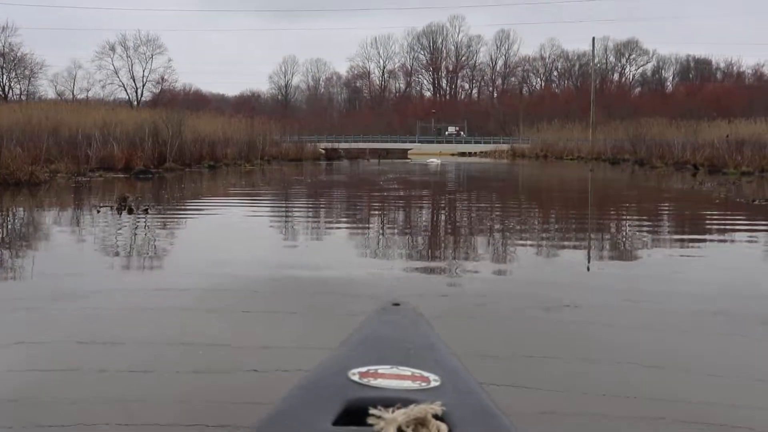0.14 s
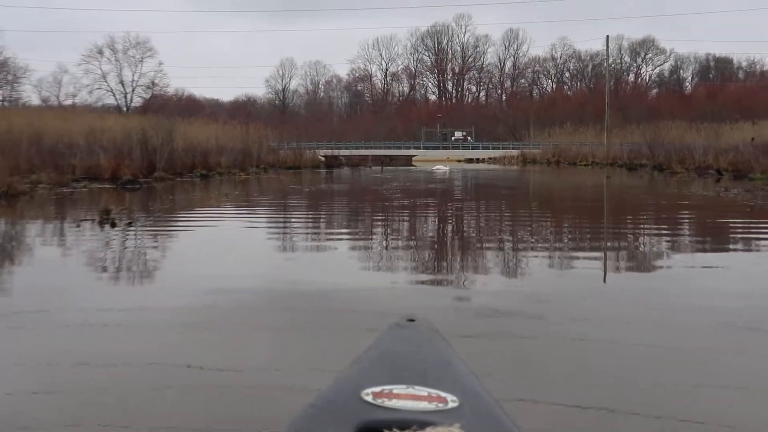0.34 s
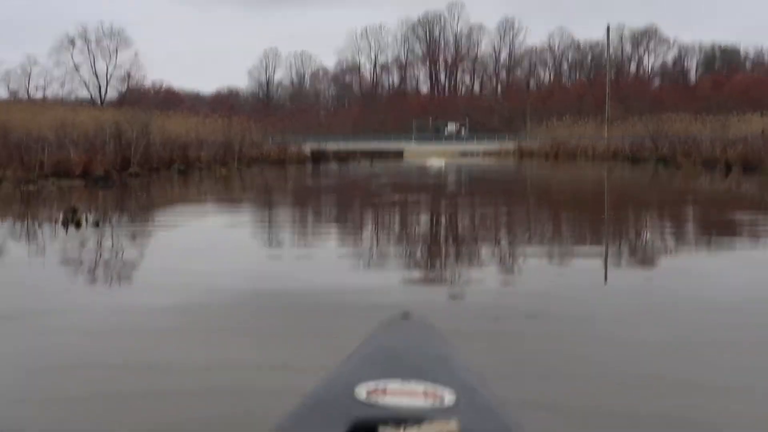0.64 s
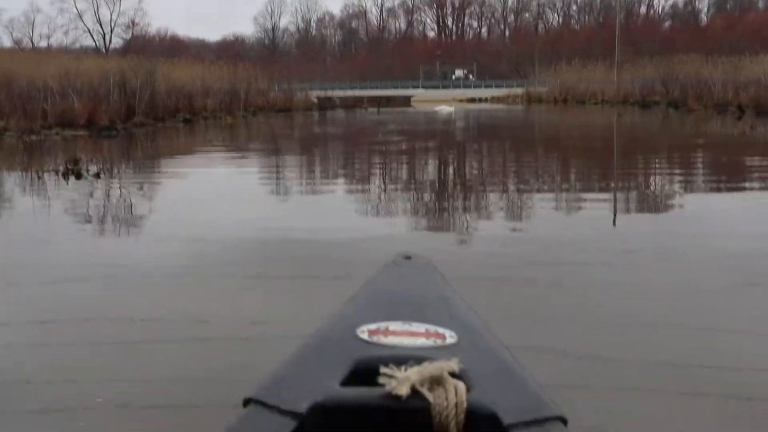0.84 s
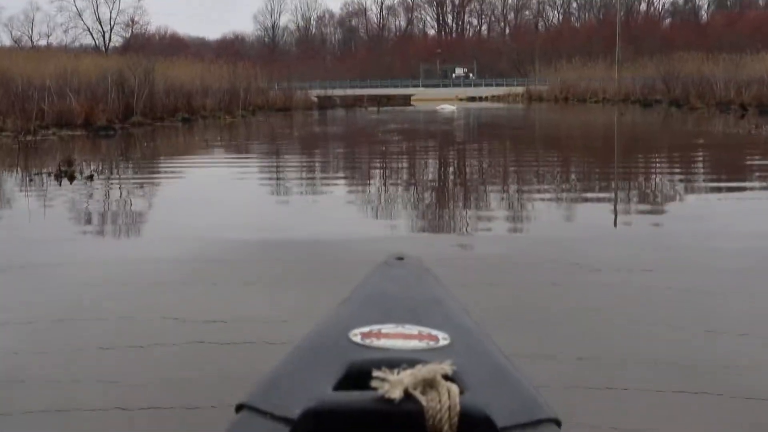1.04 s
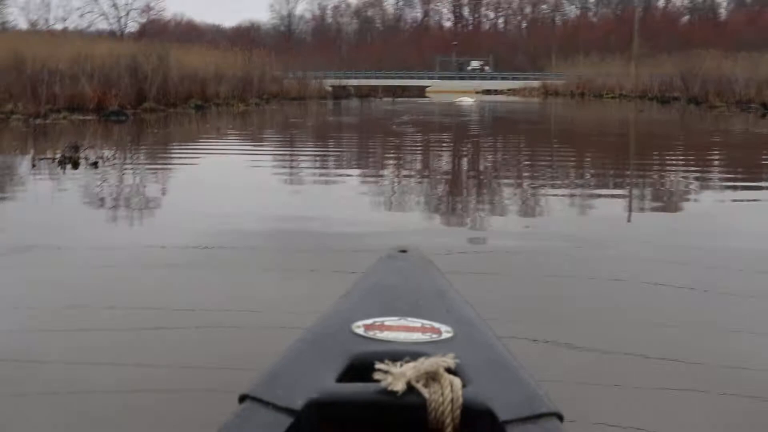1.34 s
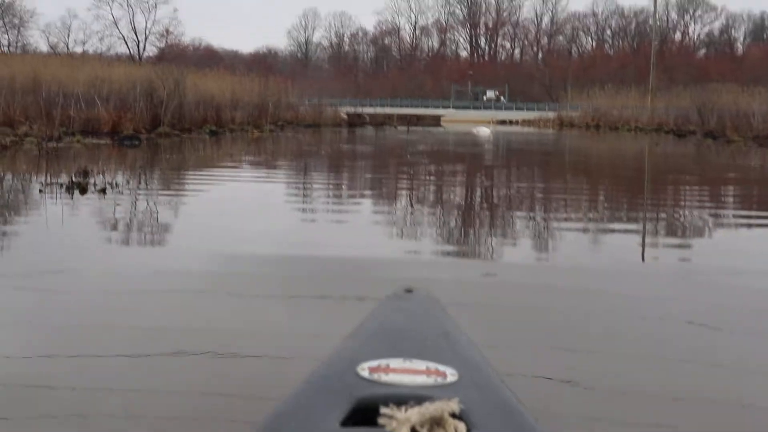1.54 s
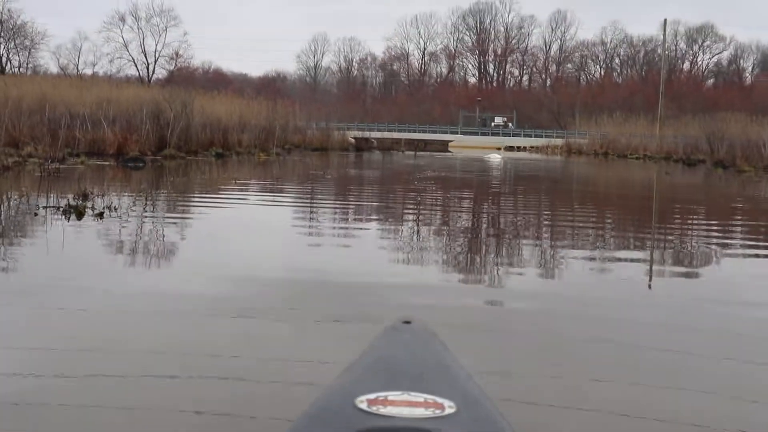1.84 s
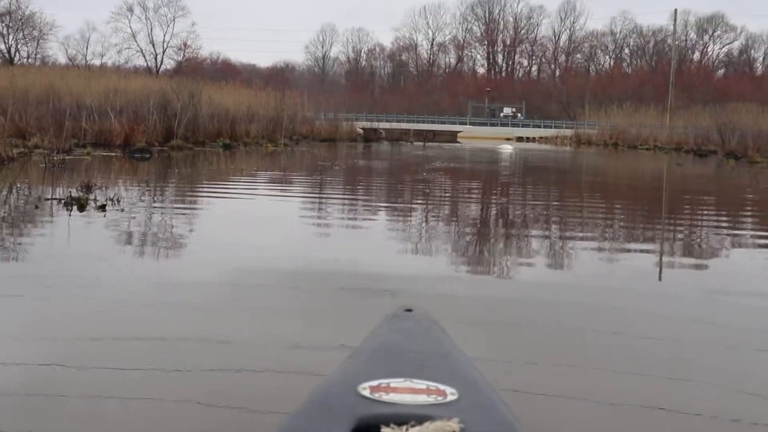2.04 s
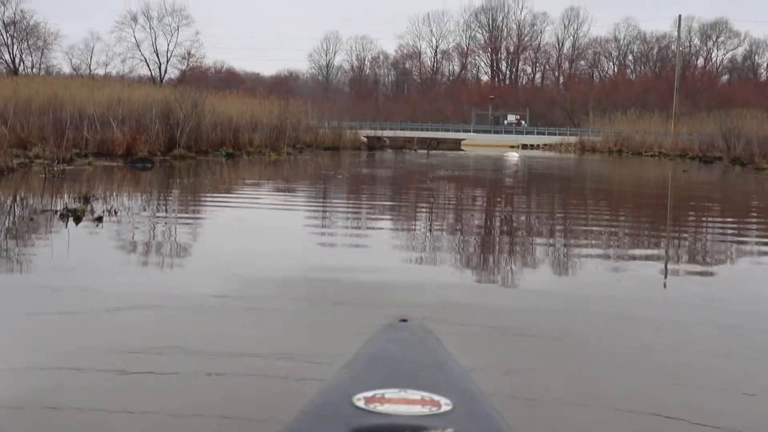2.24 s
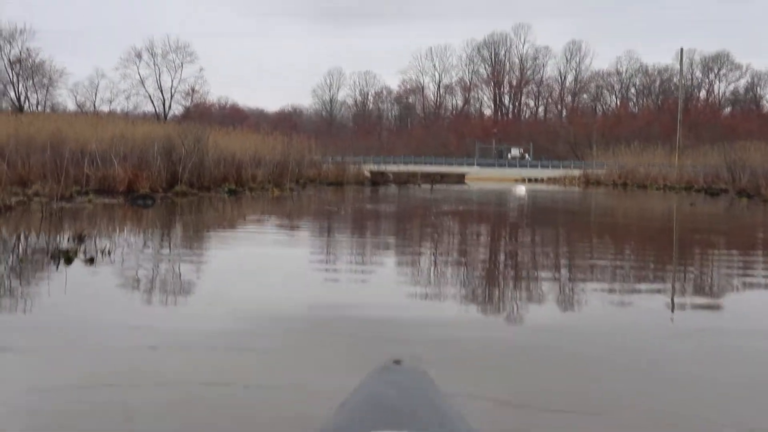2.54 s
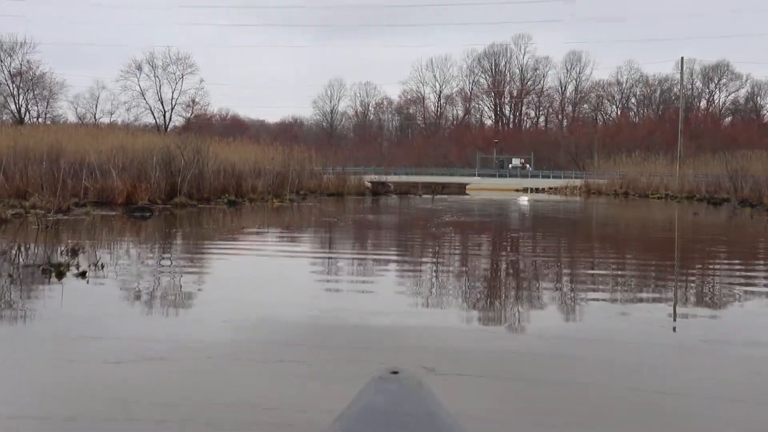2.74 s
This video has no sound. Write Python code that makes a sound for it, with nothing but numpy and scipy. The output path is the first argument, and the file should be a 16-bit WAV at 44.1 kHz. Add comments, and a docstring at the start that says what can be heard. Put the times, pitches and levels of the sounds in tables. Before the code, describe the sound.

A canoe knocks hollowly on quiet water, with a paddle scrape, small plops and faint whining.

```python
"""A hollow knock rings a canoe's hull over the distant rumble and airy hiss of a quiet marsh, while a
tiny motor whines thinly throughout. A paddle scrapes the hull in three quick strokes and sets it booming.
Water ticks and laps at the bow, droplets spit, trapped bubbles plop, and a low surge passes underneath.
Small birds chip and buzz far off, echoed by the reeds."""
import sys
import numpy as np
from scipy import signal
from scipy.fft import rfft, irfft
from scipy.io import wavfile
from scipy.ndimage import uniform_filter1d

SR = 44100
rng = np.random.default_rng(int(sys.argv[2]) if len(sys.argv) > 2 else 0)


def waveform_to_disk(signal):
    """Save audio, clipped to [-1, 1], as 16-bit WAV at the path in sys.argv[1]."""
    frames = np.transpose(np.atleast_2d(signal))
    scaled = np.clip(frames, -1, 1) * 32767
    samples = np.round(scaled).astype(np.int16)
    wavfile.write(sys.argv[1], SR, samples)


N = 127008
TOP_HZ = 15800


def undb(db):
    """Decibels to gain."""
    return 10 ** (np.asarray(db) / 20)


def clock():
    """Sample times [s]."""
    return np.arange(N) / SR


def pan(left_minus_right_db):
    """Left and right gains."""
    return undb(np.array([[1], [-1]]) * left_minus_right_db / 2)


def walk(rate_hz):
    """Smooth random drift of unit spread."""
    step = max(int(SR / rate_hz), 1)
    stairs = np.repeat(rng.standard_normal(N // step + 1), step)
    drift = uniform_filter1d(stairs, step)[:N]
    return drift / drift.std()


def noise(spectrum):
    """Noise shaped by rows of (frequency [Hz], density [dB/Hz])."""
    hz, db = np.array(spectrum, float).T
    bins_hz = np.maximum(np.arange(N // 2 + 1) * SR / N, 1)
    gain = undb(np.interp(np.log(bins_hz), np.log(hz), db))
    return irfft(rfft(rng.standard_normal(N)) * gain, N) * np.sqrt(SR / 2)


def wide_noise(spectrum, wide_hz):
    """Stereo noise, alike in the bass, unrelated above wide_hz."""
    side = [(hz, db - 10 * np.log10(1 + (wide_hz / hz) ** 2)) for hz, db in spectrum]
    return noise(spectrum) + noise(side) * np.array([[1], [-1]])


def envelope(start_s, attack_s, hold_s, t60_s):
    """Linear attack, hold, exponential release."""
    age_s = clock() - start_s
    release = np.exp(-np.log(1000) * np.clip((age_s - attack_s - hold_s) / t60_s, 0, 10))
    return np.clip(age_s / attack_s, 0, 1) * release


def splashes(events, spectrum, attack_s, wide_hz):
    """Decaying bursts of water noise."""
    bursts = sum(undb(db) * envelope(start_s, attack_s, 0, t60_s) for start_s, db, t60_s in events)
    return bursts * wide_noise(spectrum, wide_hz)


def marsh():
    """Distant rumble flickers under a smooth hiss of open air."""
    # air, in phase and in antiphase between the ears (frequency [Hz], density [dB/Hz])
    mid_spectrum = [(22, -88), (45, -71.5), (70, -65), (125, -63), (165, -68), (215, -62), (280, -68),
                    (370, -74), (540, -79), (700, -74.5), (900, -82), (1300, -84.5), (2200, -86),
                    (3000, -91.5), (4200, -94.5), (5100, -93.5), (6000, -100), (7000, -99), (11500, -110),
                    (13500, -108), (15500, -113)]
    side_spectrum = [(22, -87), (70, -86), (150, -82), (300, -84.5), (560, -87.5), (700, -86), (950, -88),
                     (2200, -87.5), (3000, -91), (5000, -98), (6000, -101), (8000, -101), (11500, -110),
                     (15500, -113)]
    flicker_db, swell_db = 0.95, -0.5
    mid = noise(mid_spectrum)
    rumble = signal.sosfiltfilt(signal.butter(2, 350, fs=SR, output="sos"), mid)
    mid += rumble * (undb(flicker_db * walk(rate_hz=9.84)) - 1)
    side = noise(side_spectrum) * np.array([[1], [-1]])
    return (mid + side) * undb(swell_db * walk(rate_hz=1.66))


def whine():
    """A tiny motor: the fundamental wobbles in pitch, the octave throbs, and both sag once."""
    # lines throb_hz apart, rising from one below the fundamental (start level [dB], end level [dB])
    low_lines = [(-51.5, -53.5), (-47, -52.5), (-54.5, -54), (-64, -64.5), (-70, -70.5)]
    # likewise from two below the octave (start level [dB], end level [dB])
    high_lines = [(-73, -67.5), (-48, -49), (-49, -50), (-53, -68)]
    whine_hz, throb_hz, jitter_rad, waver_db = 1704.9, 120.2, 0.099, 1
    sag_at_s, sag_width_s, sag_hz = 1.425, 0.014, 14

    def gain(rms_db):
        return np.sqrt(2) * undb(np.linspace(*rms_db, N) + waver_db * walk(rate_hz=12))

    t = clock()
    pitch_hz = whine_hz - sag_hz * np.exp(-((t - sag_at_s) / sag_width_s) ** 2)
    phase = 2 * np.pi * np.cumsum(pitch_hz) / SR + jitter_rad * walk(rate_hz=400)
    throb = 2 * np.pi * throb_hz * t
    # sidebands in quadrature wobble the pitch; in phase, the level
    low = sum(gain(db) * np.cos(phase + k * throb + abs(k) * np.pi / 2)
              for k, db in enumerate(low_lines, -1))
    high = sum(gain(db) * np.cos(2 * phase + k * throb) for k, db in enumerate(high_lines, -2))
    return low + high * pan(2)


def bubbles():
    """Trapped air rings and rises in pitch as it nears the surface."""
    # bubbles (time [s], pitch [Hz], rise [octaves/s], level [dB], attack [s], t60 [s])
    plops = [(.046, 7450, 8.9, -40, .001, 0.024), (.785, 770, 8, -27.5, .001, .025),
             (1.116, 8740, 55, -42, 0.00089, 0.013), (1.370, 641, 17, -29.5, 0.001, 0.1),
             (1.436, 2010, 8, -40, 0.0015, 0.041), (2.4565, 674, 34, -23.5, 0.00092, 0.036),
             (2.486, 860, 12, -33, 0.0026, 0.028), (2.488, 1215, 10, -35, 0.002, .04),
             (2.496, 990, 10, -31.5, 0.00072, 0.036), (2.600, 396, 8.4, -40, 0.023, 0.27),
             (2.674, 700, 39, -31.5, 0.02, 0.11)]
    ear_lag_s = np.array([[0], [0.00022]])  # the bow water lies to the left
    out = np.zeros((2, N))
    for start_s, hz, rise, db, attack_s, t60_s in plops:
        age_s = np.maximum(clock() - start_s - ear_lag_s, 0)
        octaves = np.minimum(rise * age_s, 2)
        pitch_hz = np.minimum(hz * 2 ** octaves, TOP_HZ) * (age_s > 0)
        phase = 2 * np.pi * np.cumsum(pitch_hz, axis=1) / SR
        out += undb(db) * envelope(start_s, attack_s, 0, t60_s) * np.sin(phase)
    return out * pan(2)


def droplets():
    """Tiny droplets spit in the high treble."""
    # spits (time [s], level [dB], t60 [s])
    spits = [(.056, -1, 0.0082), (.8048, 2, 0.013), (1.1175, 4, 0.016), (1.535, -10, .03),
             (1.670, -11, 0.031)]
    # spit noise (frequency [Hz], density [dB/Hz])
    spectrum = [(5000, -105), (7800, -100), (8600, -77), (10000, -85.5), (11000, -93), (12500, -99),
                (15500, -108)]
    return splashes(spits, spectrum, attack_s=0.0011, wide_hz=9000)


def hull_knocks():
    """Soft knocks thud and ring the hull; low modes build up slowest."""
    # knocks (time [s], level [dB])
    knocks = [(.066, -12.5), (0.423, -26.5)]
    # hull modes (frequency [Hz], relative level [dB], t60 [s])
    modes = [(170.3, -3.5, 0.24), (217.3, 1, 0.12), (286, -15.5, 0.31), (414, -0.5, 0.047),
             (491, -9.5, 0.065), (763, -14.5, 0.041), (966, -15.5, 0.046), (1360, -27, .05)]
    # dull contact noise (frequency [Hz], density [dB/Hz])
    thud_spectrum = [(150, -49), (330, -42), (600, -44), (1000, -58), (1500, -61), (2400, -65), (4000, -75),
                     (9000, -105)]
    rise_cycles, spread_rad = 3.95, 0.091
    ring, thud = np.zeros((2, N)), np.zeros(N)
    for start_s, db in knocks:
        age_s = np.maximum(clock() - start_s, 0)
        for k, (hz, mode_db, t60_s) in enumerate(modes):
            gain = (-1) ** k * undb(db + mode_db) / 2
            phase = 2 * np.pi * hz * age_s + spread_rad * rng.standard_normal((2, 1))
            ring += gain * envelope(start_s, rise_cycles / hz, 0, t60_s) * np.sin(phase)
        thud += undb(db) * envelope(start_s, attack_s=0.0023, hold_s=0, t60_s=0.16)
    return ring + thud * wide_noise(thud_spectrum, wide_hz=2000)


def water_ticks():
    """Water ticks sharply against the boat."""
    # ticks (time [s], level [dB], t60 [s])
    ticks = [(.2244, -5.5, .03), (.424, 11.5, 0.0099), (.7738, 8, 0.0059), (.7855, -6, 0.038),
             (1.4225, -4.5, .02), (2.081, -9, .03), (2.4563, -6.5, 0.021)]
    # tick noise (frequency [Hz], density [dB/Hz])
    spectrum = [(300, -90), (900, -77), (2000, -75), (4000, -78), (8000, -86), (12000, -89), (15500, -94)]
    return splashes(ticks, spectrum, attack_s=0.0005, wide_hz=2500)


def paddle():
    """Each scrape is a short gritty rasp; the hull booms on after it."""
    # scrapes (time [s], hold [s], level [dB], rasp left minus right [dB])
    scrapes = [(0.3924, .006, -9.5, -3), (0.4174, 0.0071, -3, -1.5), (0.451, 0.0074, -12.5, -4)]
    # scrape grit and hull boom (frequency [Hz], density [dB/Hz])
    grit_spectrum = [(100, -95), (400, -59), (1000, -59), (1800, -61), (2700, -62.5), (3700, -60),
                     (4600, -66.5), (5600, -72), (6700, -76.5), (8000, -74), (11000, -86.5), (15500, -90)]
    boom_spectrum = [(60, -71), (125, -48), (270, -52.5), (360, -58.5), (460, -61), (650, -59.5),
                     (1000, -76), (3000, -100)]
    rough_db = 1.5
    rasp, boom = np.zeros((2, N)), np.zeros(N)
    for start_s, hold_s, db, pan_db in scrapes:
        rasp += undb(db) * pan(pan_db) * envelope(start_s, attack_s=0.00068, hold_s=hold_s, t60_s=0.049)
        boom += undb(db) * envelope(start_s, attack_s=0.012, hold_s=hold_s, t60_s=0.24)
    grit = undb(rough_db * walk(rate_hz=1700)) * wide_noise(grit_spectrum, wide_hz=2170)
    return rasp * grit + boom * wide_noise(boom_spectrum, wide_hz=1820)


def birds():
    """Short whistled chips, some buzzing with a fast uneven warble, echoed by the reeds."""
    # notes (time [s], length [s], pitch [Hz], glide [Hz], buzz depth [Hz], level [dB])
    notes = [(0.487, 0.0098, 5280, -2, 0, -47), (.550, 0.008, 2380, -82, 62, -40),
             (0.598, .014, 4400, -6, 165, -53), (.646, .012, 2350, 1, 60, -42.5),
             (1.058, 0.014, 4450, 302, 260, -46), (1.207, .012, 4380, 200, 200, -49),
             (1.366, 0.019, 4120, 204, 0, -53), (1.569, 0.017, 3630, 304, 0, -38.5),
             (1.576, 0.039, 4070, -100, 522, -39), (1.739, 0.0383, 4400, -700, 707, -43.5),
             (1.85, 0.02, 4600, 160, 47, -46), (2.11, .018, 4100, -100, 50, -55)]
    buzz_hz, echo_db = 175, -6
    warble_hz = buzz_hz * (1 + 0.25 * walk(rate_hz=200))
    warble = np.sin(2 * np.pi * np.cumsum(warble_hz) / SR)
    song = np.zeros(N)
    for start_s, length_s, hz, glide_hz, depth_hz, db in notes:
        progress = np.clip((clock() - start_s) / length_s, 0, 1)
        pitch_hz = hz + glide_hz * (progress - 0.5) + depth_hz * warble
        song += undb(db) * np.sin(np.pi * progress) * np.sin(2 * np.pi * np.cumsum(pitch_hz) / SR)
    reeds = rng.standard_normal((2, N)) * envelope(0, attack_s=0.004, hold_s=0, t60_s=0.11)
    reeds /= np.sqrt(np.sum(reeds ** 2, axis=1, keepdims=True))
    echo = signal.fftconvolve(reeds, song[None], axes=1)[:, :N]
    return song * pan(4.5) + undb(echo_db) * echo


def bow_laps():
    """Water laps softly on the bow."""
    # laps (time [s], level [dB], t60 [s])
    laps = [(.773, -3.5, .07), (1.432, -9.5, 0.079), (2.456, -2, 0.051), (2.486, -9, 0.13)]
    # lap noise (frequency [Hz], density [dB/Hz])
    spectrum = [(150, -64), (400, -56.5), (900, -68.5), (1400, -65.5), (2100, -69), (3200, -93),
                (8000, -105)]
    return splashes(laps, spectrum, attack_s=0.0023, wide_hz=1500)


def water_surges():
    """Water surges low under the hull."""
    # surges (time [s], level [dB], t60 [s])
    surges = [(1.39, -2.5, 0.57), (1.58, -10.5, 0.41)]
    # surge noise (frequency [Hz], density [dB/Hz])
    spectrum = [(25, -70), (80, -56), (160, -58), (260, -60.5), (400, -86), (1500, -115)]
    return splashes(surges, spectrum, attack_s=0.042, wide_hz=1800)


def scene():
    """Water, boat, birds, motor and air, heard from the seat."""
    water = water_ticks() + bow_laps() + droplets() + bubbles() + water_surges()
    return water + hull_knocks() + paddle() + birds() + whine() + marsh()


def record(dry):
    """Steep low-pass on the top of the treble."""
    return signal.sosfilt(signal.ellip(10, 0.1, 80, TOP_HZ, fs=SR, output="sos"), dry)


dry = scene()
out = record(dry)
waveform_to_disk(out)
```